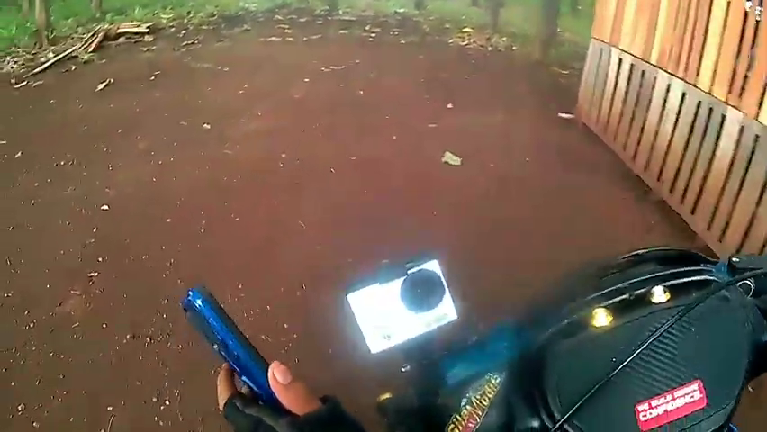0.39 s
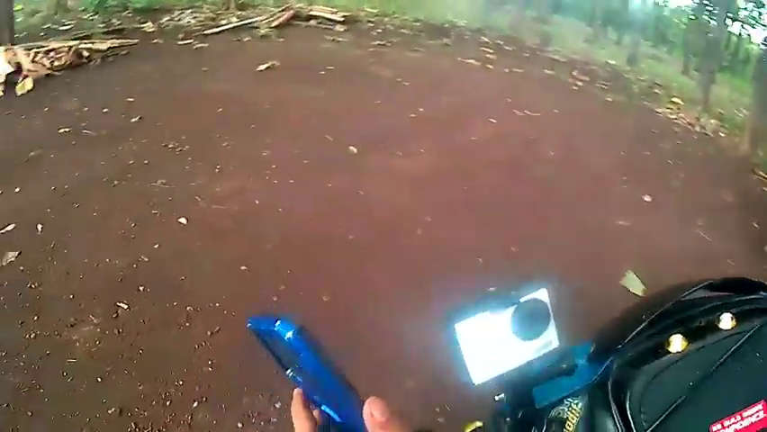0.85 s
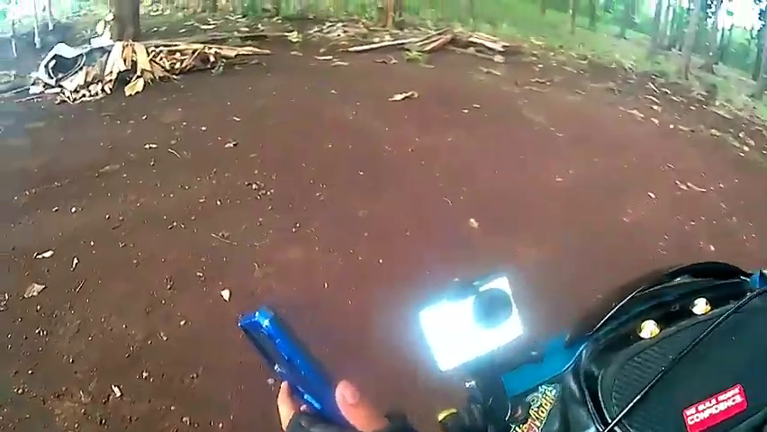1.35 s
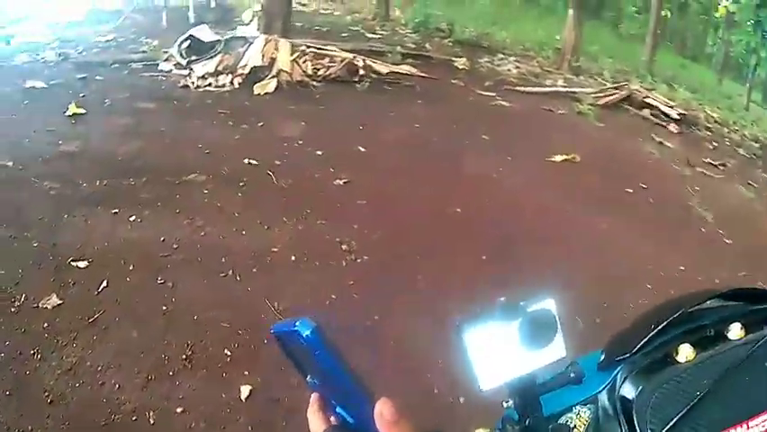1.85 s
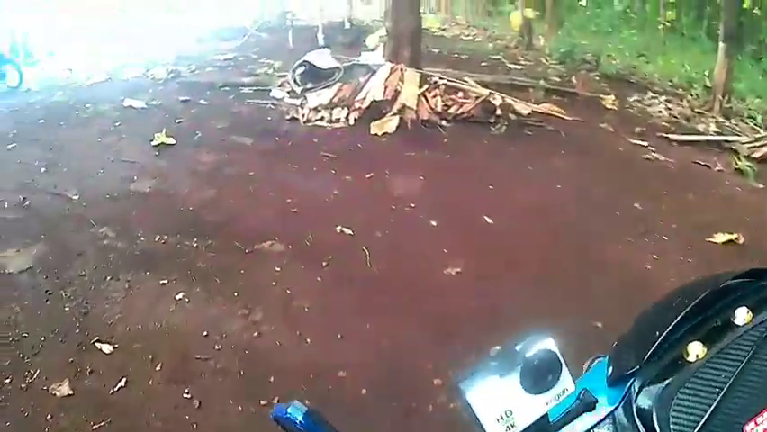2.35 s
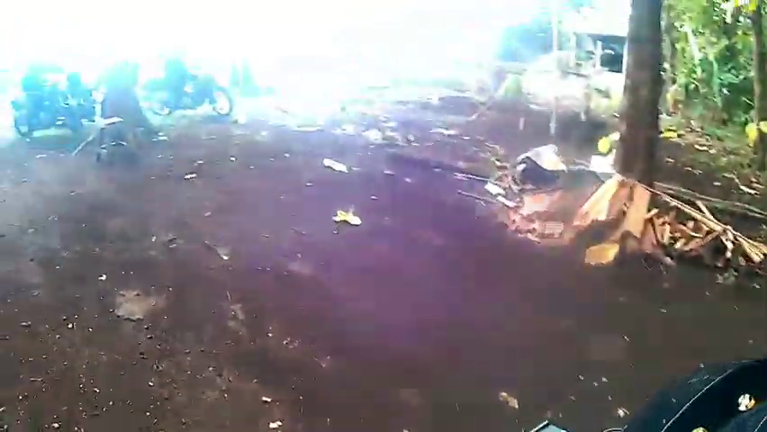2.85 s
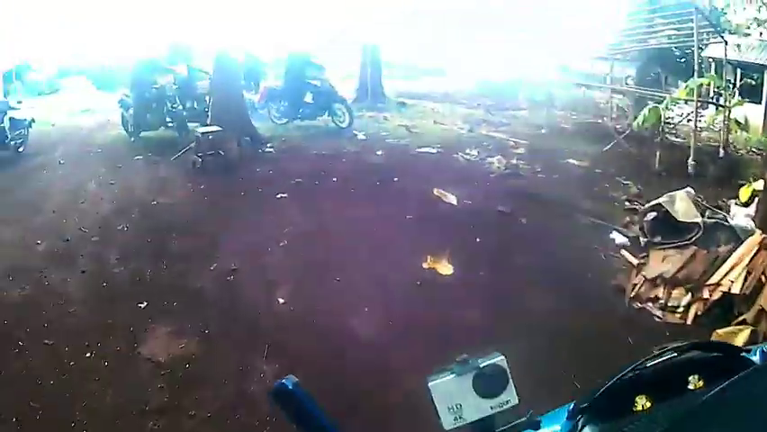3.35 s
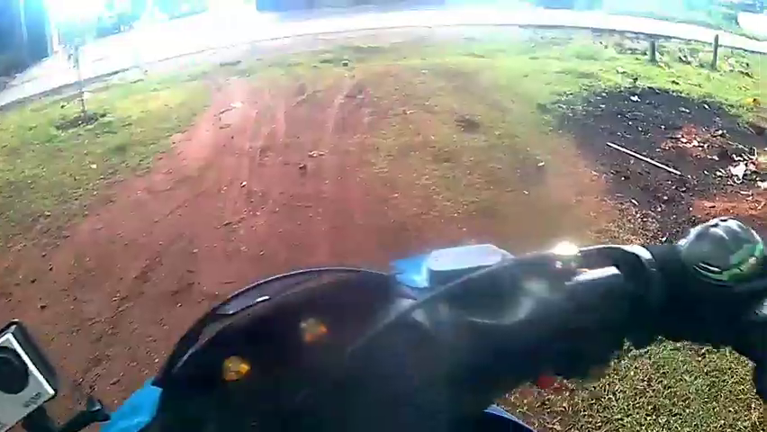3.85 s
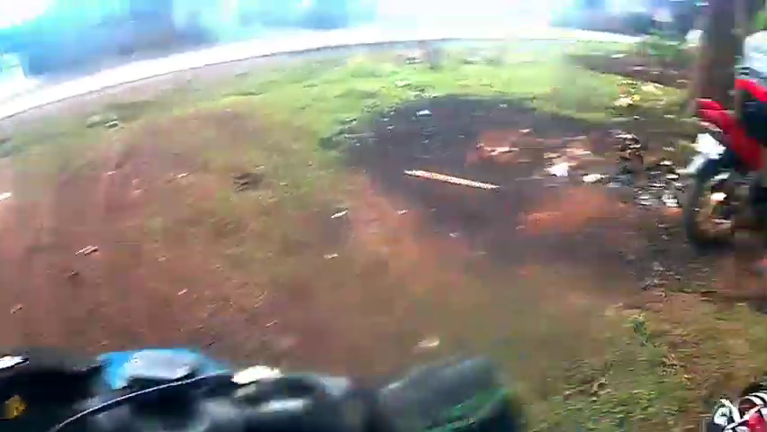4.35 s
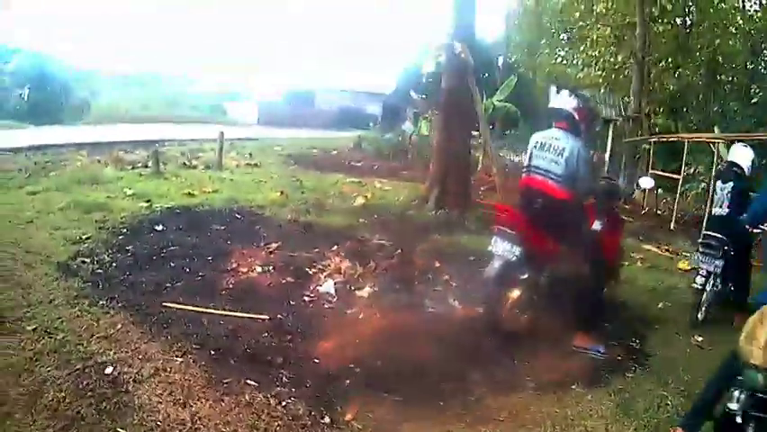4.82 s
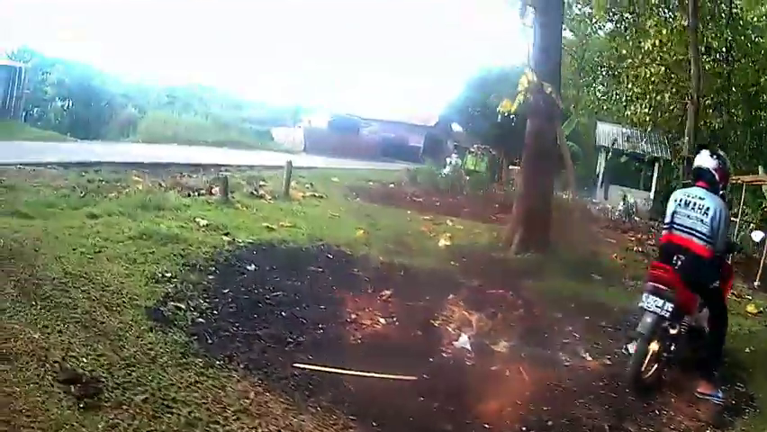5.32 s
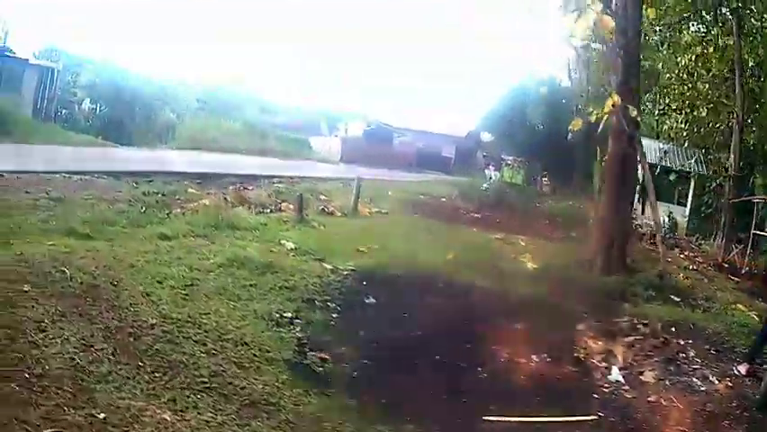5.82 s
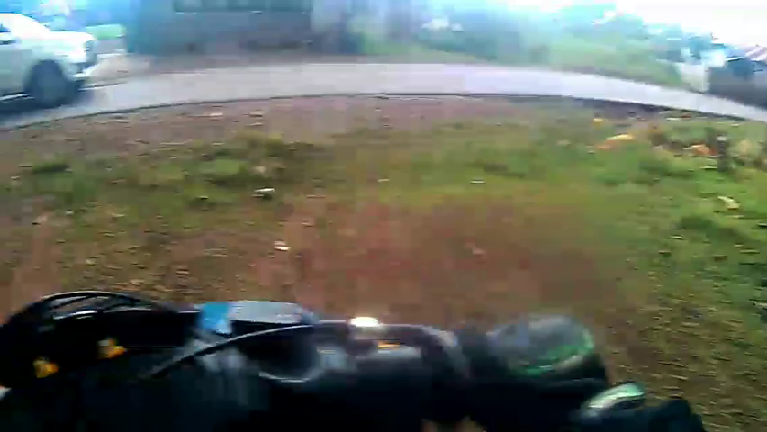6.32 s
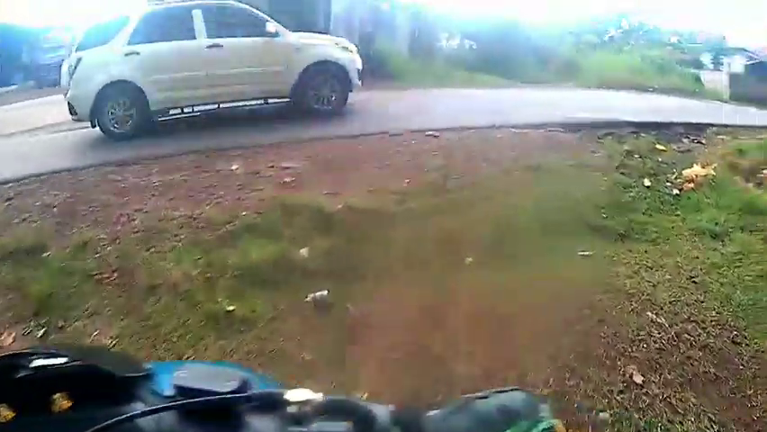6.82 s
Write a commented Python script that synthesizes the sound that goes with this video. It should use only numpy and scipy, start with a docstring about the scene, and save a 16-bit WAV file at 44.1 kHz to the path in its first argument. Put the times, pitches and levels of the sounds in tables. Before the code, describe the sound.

A single-cylinder motorcycle idles very close, quick dry exhaust puffs with metal clatter, beside a slower, uneven idling bike and a low murmur of engines further off. An abrupt cut with a blink of silence brings slow deep thumps that draw away, scattered pops from another bike and more metallic ticks, while the near engine gradually revs up. Outdoors, on a helmet camera: peaks squashed, treble dull and flickering, grainy hiss.

```python
"""A single-cylinder motorcycle idles in a dirt yard over engines further off, heard by a helmet camera.
A second bike idles lumpily beside it; both fire puffs of gas that ring their exhausts, and loose metal ticks.
After a cut with a short silence, a slow deep engine thumps and draws away, while another bike pops.
The first bike's throttle then creeps up, its parts clattering with each firing.
Loud peaks are flattened by the camera's input; a grainy hiss and flickering treble lie over everything."""
import sys
import numpy as np
from scipy import signal
from scipy.io import wavfile
from scipy.ndimage import uniform_filter1d

SR = 44100
rng = np.random.default_rng(int(sys.argv[2]) if len(sys.argv) > 2 else 0)


def pcm_store(signal):
    """Save signal as 16-bit PCM."""
    levels = np.round(np.clip(np.atleast_2d(signal), -1, 1) * 32767)
    wavfile.write(sys.argv[1], SR, levels.astype(np.int16).T)


def convert_level_to_amplitude(level_db):
    """Map a level in decibels to its linear amplitude factor."""
    exponent = np.asarray(level_db, float) / 20
    return 10 ** exponent


N = 306054
TIME = np.arange(N) / SR
# The cut between the two parts: where the first ends and where the second becomes audible, in seconds.
CUT_S = (3.7657, 3.8228)


def curve(table):
    """Draws straight lines between the rows of a table whose first column is time in seconds."""
    s, *columns = np.transpose(table)
    return [np.interp(TIME, s, c) for c in columns]


def band(x, hz, width):
    """A single resonance (two poles) with gain 1 at its centre; width in Hz."""
    return signal.lfilter(*signal.iirpeak(hz, hz / width, fs=SR), x)


def walk(rate):
    """A wandering random level with spread near 1: values held for 1 / rate seconds, then smoothed twice."""
    hold = int(SR / rate)
    steps = np.repeat(rng.standard_normal(N // hold + 1), hold)
    return 1.3 * uniform_filter1d(uniform_filter1d(steps, hold), hold)[:N]


def firing_times(rates, first, last):
    """An engine fires each time its running count of cycles passes a whole number."""
    cycles = np.cumsum(curve(rates)[0]) / SR
    cycles = cycles - np.interp(first, TIME, cycles)
    count = np.interp(last, TIME, cycles)
    return np.interp(np.arange(count), cycles, TIME)


def spikes(times, db):
    """One impulse per event."""
    x = np.zeros(N)
    at = np.clip((np.asarray(times) * SR).astype(int), 0, N - 1)
    np.add.at(x, at, convert_level_to_amplitude(db))
    return x


def smooth(x, seconds):
    """Spreads each impulse into a decaying tail of the same area (one-pole lag)."""
    pole = np.exp(-1 / (seconds * SR))
    return signal.lfilter([1 - pole], [1, -pole], x)


def swell(times, db, seconds):
    """A rounded rise and fall after each event, with its peak near the given dB."""
    return smooth(smooth(spikes(times, db), seconds), seconds) * seconds * SR * np.e


def exhaust(times, db, modes, puff_s, scatter_db, pitch=1):
    """Each firing is a short puff of gas that rings the pipe modes, each a little differently every time."""
    out = 0
    for hz, mode_db, t60, sign in modes:
        puff_db = db + scatter_db * rng.standard_normal(len(times))
        puffs = smooth(smooth(spikes(times, puff_db), puff_s), puff_s)
        # a spinning phase, so that the mode can change pitch while it rings
        turn = np.exp(2j * np.pi * hz * np.cumsum(pitch * np.ones(N)) / SR)
        decay = np.exp(-np.log(1000) / (t60 * SR))
        ring = (turn * signal.lfilter([1], [1, -decay], puffs / turn)).imag
        out = out + sign * convert_level_to_amplitude(mode_db) * ring
    return out


# What the loose metal of the engines rings with. Each row: pitch in Hz, width in Hz, relative level in dB.
METAL_RINGS = [(515.6, 44, 4), (774, 140, -5.5), (1153, 150, -3.5), (1500, 390, -2.5), (1760, 290, -1.5),
               (2100, 230, -7.5), (2610, 480, -9), (3610, 590, -9.5)]


def rattle(knocks_per_s, spread_db):
    """Random knocks of very unequal size; every resonance is struck by its own parts. Overall rms 1."""
    out = 0
    for hz, width, db in METAL_RINGS:
        hits = rng.random(N) < knocks_per_s / SR
        knocks = hits * rng.standard_normal(N) * convert_level_to_amplitude(spread_db * walk(13))
        out = out + convert_level_to_amplitude(db) * band(band(knocks, hz, width), hz, 2 * width) / np.sqrt(width)
    return out / out.std()


# The first bike's speed before and after the cut. Each row: time in seconds, firings per second.
IDLE_SPEED = [(0, 14.844), (.132, 16.953), (.502, 15.388), (1.05, 14.918), (1.324, 15.537), (1.423, 13.86),
              (1.539, 15.333), (1.854, 16.666), (2.138, 16.384), (2.941, 16.94), (3.458, 16.377)]
THROTTLE_SPEED = [(4.11, 16.591), (5.035, 17.374), (5.976, 18.63), (6.454, 20.028), (6.897, 20.376)]
# The first firing of each part, in seconds.
FIRST_FIRING_S = (.0122, 3.8041)
# Muffler modes. Each row: pitch in Hz, level in dB, time to fall 60 dB in seconds, polarity.
MUFFLER_MODES = [(74.5, 3.8, .071, -1), (115.3, 18.8, .071, 1), (217, 20.4, .045, -1),
                 (314, 21.6, .036, -1), (352, 22.8, .044, 1), (402, 8, .11, 1), (434, 15.4, .058, -1)]
# Low pipe tones that ring on between firings. Each row: pitch in Hz, level in dB,
# time to fall 60 dB in seconds, polarity.
BOOM_MODES = [(118, -8, .15, 1), (176, -13, .2, 1), (235, -8, .09, -1), (345, -4, .09, -1)]


def own_engine():
    """Even firings, one of them weak; more speed makes the pipe louder and higher, and metal rattles along."""
    steady_per_s, full_per_s = 17.53, 17.4  # reference speed; speed at which the blast stops growing
    blast_rise_db, boom_rise_db, clatter_sag_db = 1.8, 3.8, 2.2  # per firing a second
    misfire_s, misfire_db = .574, -14
    before = firing_times(IDLE_SPEED, FIRST_FIRING_S[0], CUT_S[0])
    after = firing_times(THROTTLE_SPEED, FIRST_FIRING_S[1], N / SR)
    times = np.r_[before, after]
    speed = np.where(TIME < CUT_S[0], curve(IDLE_SPEED)[0], curve(THROTTLE_SPEED)[0])
    revs = speed - steady_per_s
    revs_at_firing = revs[(times * SR).astype(int)]
    # hotter gas lifts the pipe modes by this share per firing a second
    pitch = 1 + .0104 * revs
    miss_db = np.where(abs(times - misfire_s) < .02, misfire_db, 0)
    blast_db = 2.05 + blast_rise_db * np.clip(revs_at_firing, -1.4, full_per_s - steady_per_s)
    charge_db = blast_db + miss_db + 0.66 * rng.standard_normal(len(times))
    # the valve leaks a small puff just before it opens fully
    puff_times = np.r_[times, times - .0028]
    puff_db = np.r_[charge_db, charge_db - 16]
    pipe = exhaust(puff_times, puff_db, MUFFLER_MODES, puff_s=.002, scatter_db=.3, pitch=pitch)
    boom_db = boom_rise_db * revs_at_firing + miss_db
    boom = exhaust(times, boom_db, BOOM_MODES, puff_s=.002, scatter_db=1, pitch=pitch)
    # one chuff with the firing, another as the valves seat about half a cycle on
    chuff_db = 4 * rng.standard_normal((2, len(times)))
    firing_chuff = swell(times, miss_db + 0.3 + chuff_db[0], 0.011)
    valve_chuff = swell(times + .03, -7.5 + chuff_db[1], 0.0044)
    gate = 1.0 + firing_chuff + valve_chuff
    # the clatter sags below the reference speed and grows only slowly above it
    clatter_db = -38 + clatter_sag_db * np.minimum(revs, .3 * revs)
    return pipe + boom + convert_level_to_amplitude(clatter_db) * gate * rattle(knocks_per_s=170, spread_db=1.5)


# How loud the engines further off are. Each row: time in seconds, level in dB.
YARD_LEVEL = [(0, -21), (.6, -23.5), (1.6, -23.5), (2, -21.5), (3.8, -21.5), (3.83, -19), (5.5, -20),
              (6.2, -21), (6.94, -21)]
# The spectrum of those engines. Each row: frequency in Hz, relative level in dB per Hz.
YARD_SPECTRUM = [(30, -10.5), (60, -5.5), (80, -1.5), (105, -14.5), (180, -3), (300, -8.5), (500, -17),
                 (700, -30), (1200, -24.5), (1800, -30.5), (3600, -53.5)]


def yard():
    """Half-octave bands of noise throb together like far exhausts, and each also flickers alone."""
    out, throb = 0, walk(21.904)
    points_hz, points_db = np.transpose(YARD_SPECTRUM)
    for hz in 32 * 2 ** np.arange(0, 7, .5):
        db = np.interp(np.log(hz), np.log(points_hz), points_db) + 1.8 * throb + 1.6 * walk(9)
        noise = rng.standard_normal(N)
        out = out + convert_level_to_amplitude(db) * band(band(noise, hz, hz / 2), hz, hz / 2)
    return convert_level_to_amplitude(curve(YARD_LEVEL)[0]) * out / out.std()


# The neighbouring bike's speed. Each row: time in seconds, firings per second.
NEIGHBOUR_SPEED = [(.747, 9.287), (1.793, 9.849), (2.088, 9.182), (3.466, 9.379), (3.8, 7.66)]
# Its exhaust modes. Each row: pitch in Hz, level in dB, time to fall 60 dB in seconds, signed strength.
NEIGHBOUR_MODES = [(70.57, -13, 0.53, 0.98), (146, -13.5, 0.33, 0.65), (184.6, -13.5, 0.19, -1.3),
                   (253, -4, 0.06, -0.52)]


def neighbour():
    """Slightly uneven firings ring a second exhaust; out of earshot after the cut."""
    times = firing_times(NEIGHBOUR_SPEED, .0105, CUT_S[0])
    times = times + 0.0014 * rng.standard_normal(len(times))
    pipe = exhaust(times, 0, NEIGHBOUR_MODES, puff_s=0.00027, scatter_db=0.5)
    return pipe * (TIME < CUT_S[1])


# Metallic ticks from the machines. Each row: start in seconds, starting level in dB, pitch in Hz.
METAL_TICKS = [(.63, -27, 1600), (1.56, -27, 1600), (1.923, -24.5, 1338), (2.6374, -27.5, 1730),
               (2.7038, -23, 1662), (3.1948, -26, 1560), (3.2244, -24, 2120), (3.827, -34.5, 3060),
               (3.832, -27, 2870), (3.837, -28.5, 2620), (3.866, -16.5, 1820), (4.184, -19, 1930),
               (4.372, -20.5, 1645), (4.4188, -29.5, 1390), (4.553, -29.5, 3300), (4.675, -28, 1273),
               (4.8064, -18, 1123), (4.8685, -20, 1104), (4.9216, -21.5, 1706), (5.1115, -20.5, 1288),
               (5.334, -22, 1700), (5.376, -19, 1740), (5.501, -25, 1500), (5.65, -21, 1550),
               (5.7198, -20, 1780)]


def ticks():
    """Loose metal rings briefly: noise through one resonance, dying away after each start."""
    t60_s = 0.038
    out, shake = 0, rng.standard_normal(N)
    for s, db, hz in METAL_TICKS:
        fall = np.exp(-np.log(1000) * np.maximum(TIME - s, 0) / t60_s) * (TIME >= s)
        ring = band(shake, hz, .18 * hz)
        out = out + convert_level_to_amplitude(db) * fall * ring / ring.std()
    return out


# The deep engine's thumps, one a firing. Each entry: time in seconds.
THUMP_TIMES = [3.833, 3.998, 4.187, 4.367, 4.554, 4.744, 4.922, 5.112, 5.288, 5.466, 5.631, 5.837, 5.999,
               6.2, 6.378, 6.555, 6.731, 6.906]
# Its exhaust modes. Each row: pitch in Hz, level in dB, time to fall 60 dB in seconds, signed strength.
DEEP_MODES = [(44.3, 3.1, 0.13, -1.1), (62.4, -0.3, 0.44, 0.91), (122, -11, 0.34, 0.99),
              (170.2, 4.5, 0.21, 0.99)]
# The spit of gas that leads each thump. Each row: pitch in Hz, level in dB,
# time to fall 60 dB in seconds, signed strength.
SPIT_MODES = [(260, -2.5, 0.009, -1.2)]


def deep_engine():
    """Slow heavy thumps, each with a spit and a rasp, over a steady rattle; all fade as it draws away."""
    thump_db, rasp_db, shake_db = 2, -28, -32
    # it stands, then its distance grows each second by this share of the first distance
    leaves_s, recedes_per_s = 4.34, 0.95
    distance = 1 + recedes_per_s * np.maximum(TIME - leaves_s, 0)
    gain = (TIME >= CUT_S[0]) / distance
    times = np.array(THUMP_TIMES)
    spit = exhaust(times - .0025, thump_db, SPIT_MODES, puff_s=.0004, scatter_db=4)
    rasp_level = swell(times, rasp_db, .009) + convert_level_to_amplitude(shake_db)
    rasp = rasp_level * rattle(knocks_per_s=170, spread_db=1.5)
    thumps = exhaust(times, thump_db, DEEP_MODES, puff_s=.0014, scatter_db=.4)
    return gain * (rasp + spit + thumps)


# The clearest pops of a lumpy bike further along. Each row: time in seconds, puff level in dB.
POP_TIMES = [(3.8269, 1.5), (3.872, -0.5), (3.906, 3.5), (4.063, 1), (4.24, -1), (4.438, 1), (4.54, 2.5),
             (4.636, -5), (4.676, -1), (4.739, -2), (5.041, -4), (5.113, -1), (5.337, -2.5), (5.437, -1.5),
             (5.62, -6), (5.899, -6.5), (6.01, -1.5), (6.2, -4.5), (6.341, -1.5), (6.496, 3), (6.64, -0.5),
             (6.701, -2.5), (6.769, -1), (6.904, 2)]
# Its exhaust modes. Each row: pitch in Hz, level in dB, time to fall 60 dB in seconds, polarity.
POP_MODES = [(163, -8.5, 0.13, 1), (255, -7, 0.025, 1)]


def far_bike():
    """Separate dry pops: very short puffs ring two exhaust modes."""
    times, db = np.transpose(POP_TIMES)
    return exhaust(times, db, POP_MODES, puff_s=0.00041, scatter_db=1.0)


def scene():
    """All machines add up at one microphone."""
    machines = own_engine() + yard() + neighbour() + ticks() + deep_engine() + far_bike()
    return machines[None]


def flatten_peaks(x):
    """The overloaded input rounds peaks off towards a ceiling, with a little of the sound leaking past."""
    ceiling, leak = .71, .015
    return ceiling * np.sign(x) * np.tanh((abs(x) / ceiling) ** 3) ** (1 / 3) + leak * x


def flicker_treble(x, loudness):
    """The top of the treble drops out in short blocks, and is kept more often when the sound is loud."""
    dull = signal.sosfiltfilt(signal.cheby2(10, 30, 3795, fs=SR, output="sos"), x)
    block = int(.023 * SR)  # samples in 23 ms
    drive = uniform_filter1d(loudness[0], size=block)[block // 2::block]
    kept = 1. * (drive + .5 * rng.standard_normal(len(drive)) > 1.6)
    is_kept = uniform_filter1d(np.repeat(kept, block), size=300)
    is_kept = np.resize(is_kept, N)
    return dull + is_kept * (x - dull)


def low_pass(x):
    """Removes everything above the highest recorded frequency."""
    return signal.sosfilt(signal.butter(12, 16500, fs=SR, output="sos"), x)


def record(dry):
    """Peaks are flattened, hiss joins and the treble is cut and flickers; a silent gap and soft end follow."""
    capsule = signal.sosfilt(signal.butter(1, 6, "high", fs=SR, output="sos"), dry)
    clipped = flatten_peaks(capsule)
    coupled = signal.sosfilt(signal.butter(1, 3, "high", fs=SR, output="sos"), clipped)
    # a grainy hiss, louder when the sound is louder
    loudness = 0.3 + uniform_filter1d(abs(coupled), 700) / 0.2
    hiss = band(rng.standard_normal(N), 1200, 1100) * loudness
    hissy = coupled + convert_level_to_amplitude(-40.5) * hiss / hiss.std()
    # 80 dB down from 5482.3 Hz up
    narrow = signal.sosfilt(signal.cheby2(10, 80, 5482.3, fs=SR, output="sos"), hissy)
    flickering = flicker_treble(narrow, loudness)
    gap = np.where(TIME < CUT_S[0], 1, np.clip((TIME - CUT_S[1]) / 0.0021, 0, 1))
    soft_end = np.clip((TIME[-1] - TIME) / .003, 0, 1)
    return low_pass(flickering * gap * soft_end)


dry = scene()
out = record(dry)
pcm_store(out)
```